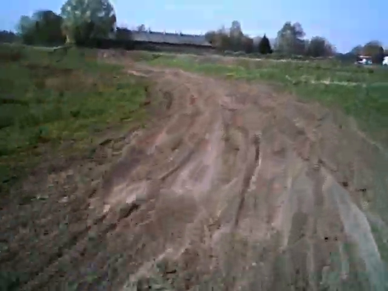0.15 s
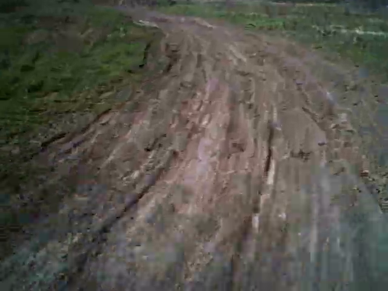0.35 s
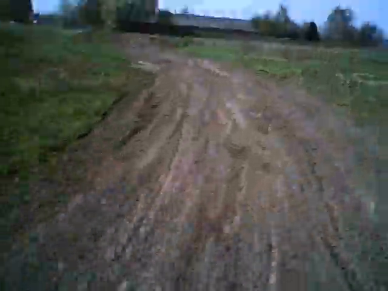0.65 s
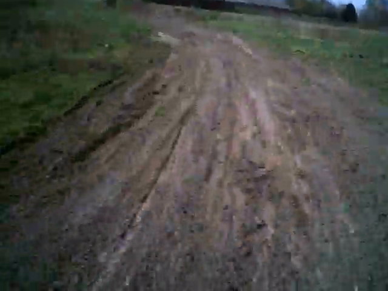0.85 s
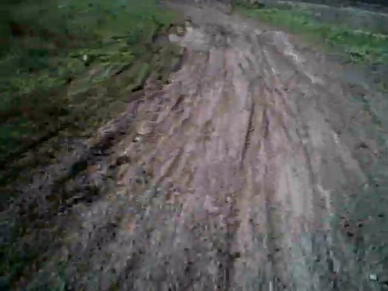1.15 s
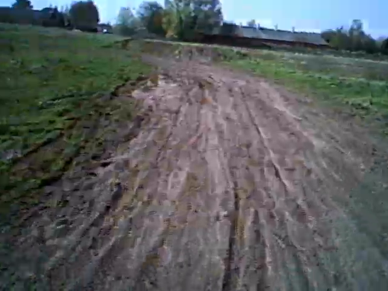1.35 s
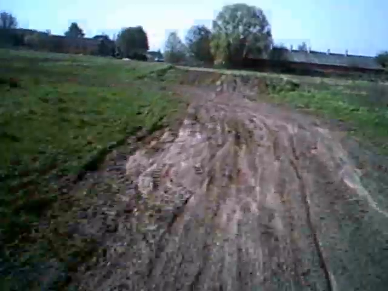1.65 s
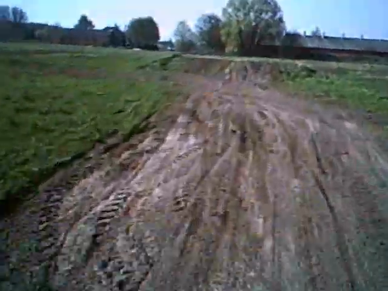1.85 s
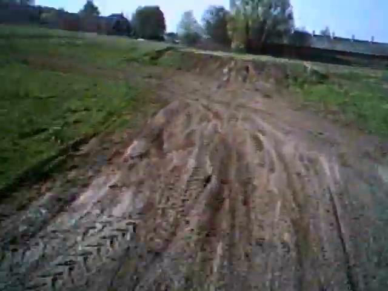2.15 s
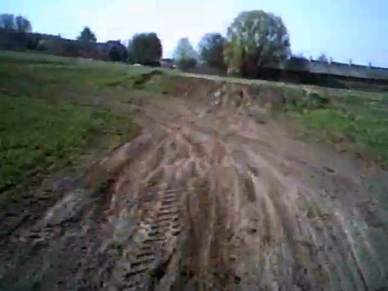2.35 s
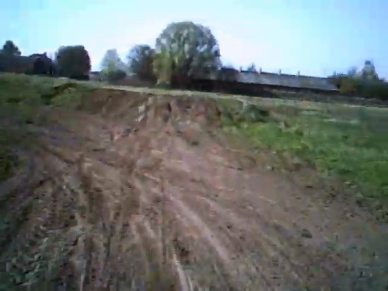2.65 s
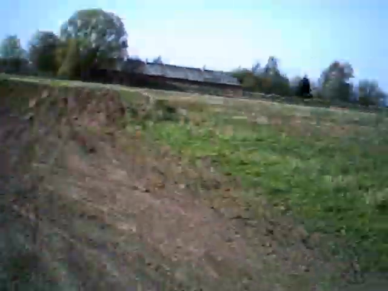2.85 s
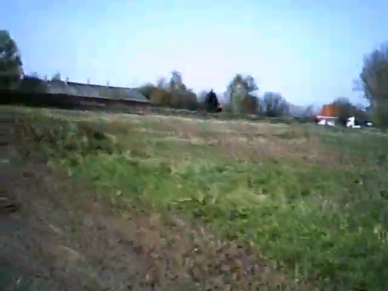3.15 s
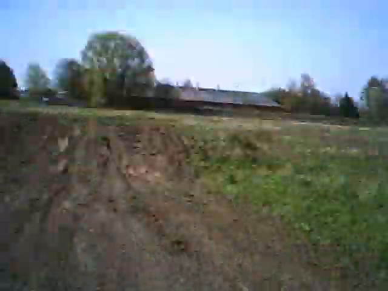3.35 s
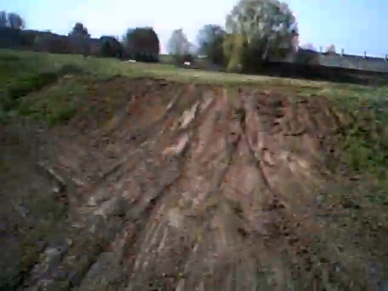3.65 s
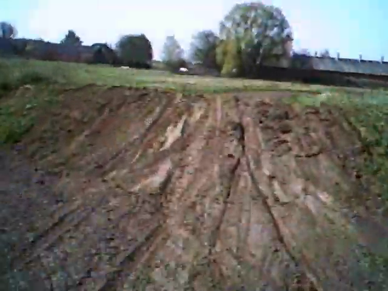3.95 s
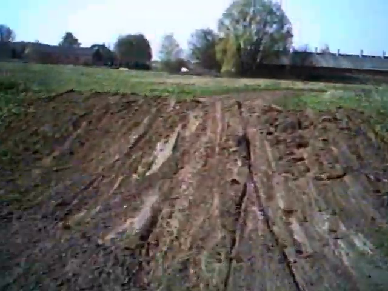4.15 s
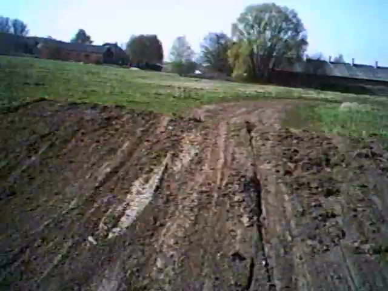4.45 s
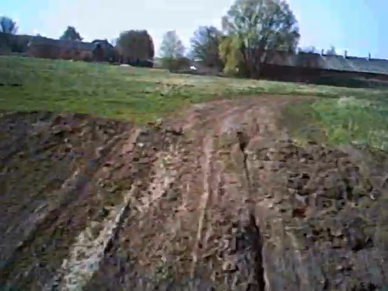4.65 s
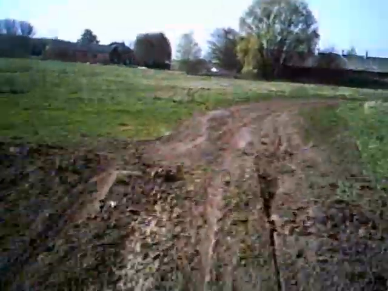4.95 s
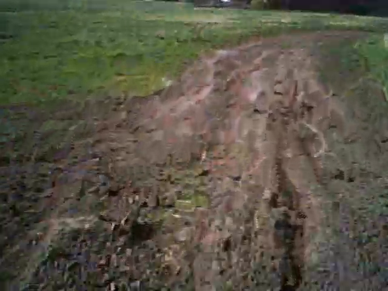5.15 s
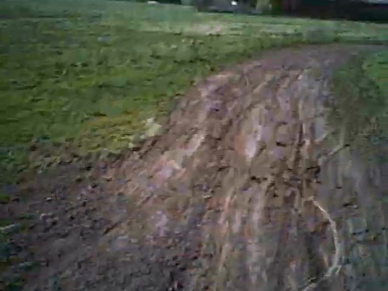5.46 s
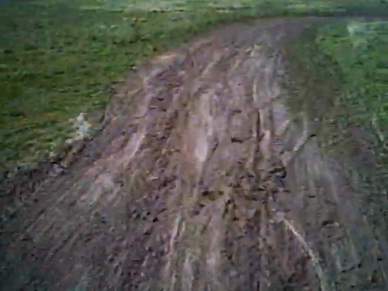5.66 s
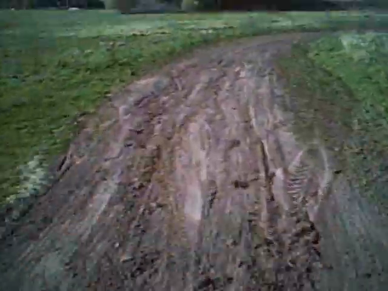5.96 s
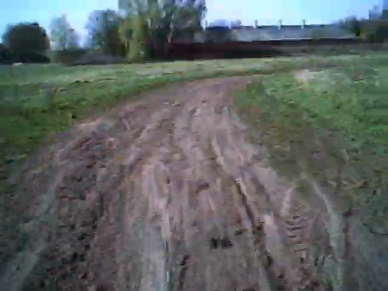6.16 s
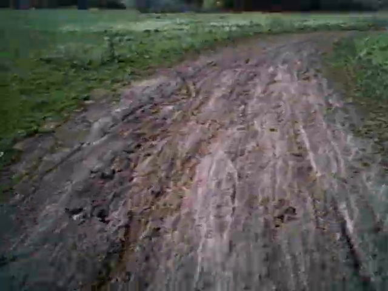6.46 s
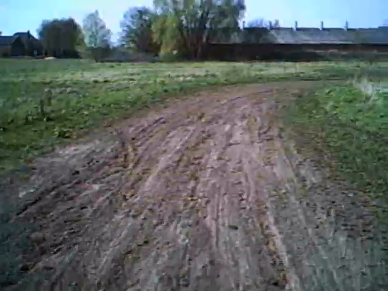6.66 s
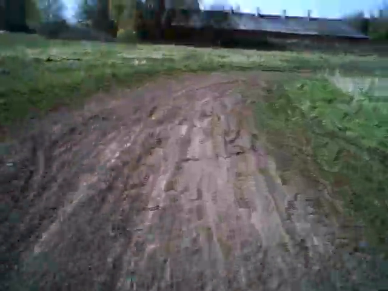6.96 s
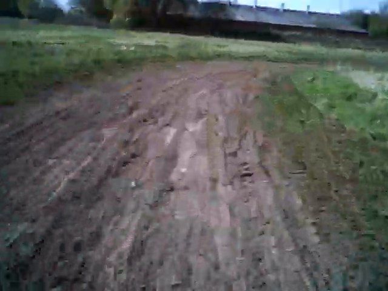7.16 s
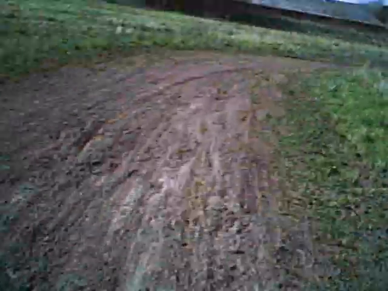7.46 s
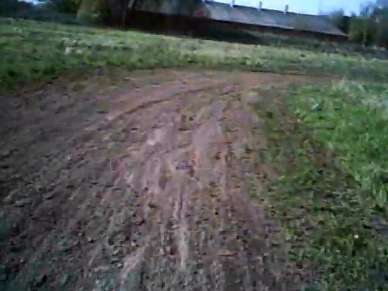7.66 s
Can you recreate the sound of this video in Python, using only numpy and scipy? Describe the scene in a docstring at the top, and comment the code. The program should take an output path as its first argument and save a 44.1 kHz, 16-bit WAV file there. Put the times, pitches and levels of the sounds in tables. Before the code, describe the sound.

A small single-cylinder engine revs and eases over a rough dirt track, rattling and clacking, with wind gusts buffeting an overloaded onboard microphone.

```python
"""A small single-cylinder four-stroke rides a rough dirt track, heard by a microphone on board.
It starts on open throttle and revs up through gusts in the first two seconds, slows by 3 s to a low thump as a hard
gust and sharp ticks break in, takes two brief stabs of throttle before 5 s, then revs and eases to the end.
Exhaust pulses are sums of harmonics weighted by pipe resonances; bark, clatter, ticks, hiss and wind are
filtered impulses and noise. A preamplifier saturates on the loud passages and passes only a narrow band."""
import sys
import numpy as np
from scipy import signal
from scipy.fft import rfft, irfft
from scipy.io import wavfile
from scipy.ndimage import uniform_filter1d

SR = 44100
rng = np.random.default_rng(int(sys.argv[2]) if len(sys.argv) > 2 else 0)


def master(y):
    """Save y as 16-bit WAV."""
    cut = np.clip(np.atleast_2d(y).T, -1, 1)
    pcm = np.round(cut * 32767)  # scale
    wavfile.write(sys.argv[1], SR, pcm.astype(np.int16))


N = 343980  # samples

CRUISE_HZ = 45  # firing rate at cruising speed
RELEASE_S = 0.11  # the throttle closes
RUT_FADE_S = 0.13
BREEZE_DB, GUST_FALL_S = -31.5, 0.32
SMALL_TICKS_PER_S, SMALL_TICK_DB, SMALL_TICK_SPREAD_DB = 2.2, -31.5, -1.5
BAND_HZ, TOP_HZ = 3680, 15800  # band limits after the first and second saturation


def undb(db):
    """Decibels are logarithmic: 20 dB is a tenfold amplitude."""
    return 10 ** (np.asarray(db) / 20)


def steady(x, size=8820):
    """Level normalization: division by a running rms leaves only the fast flutter."""
    power = uniform_filter1d(uniform_filter1d(x ** 2, size), size // 2)
    return x / np.sqrt(np.abs(power) + 1e-18)


def lowpass(x, hz, order=2):
    """Butterworth filtering: a smooth roll-off above hz."""
    return signal.sosfilt(signal.butter(order, hz, fs=SR, output="sos"), x)


def cut(x, hz):
    """Elliptic filtering: a steep band limit."""
    return signal.sosfilt(signal.ellip(8, 0.2, 75, hz, fs=SR, output="sos"), x)


def resonate(x, resonances):
    """Modal superposition: parallel band-pass resonances, neighbours of opposite sign."""
    total = 0
    for k, (hz, width, db) in enumerate(resonances):
        b, a = signal.iirpeak(hz, hz / width, fs=SR)
        total = total + (-1) ** k * undb(db) * signal.lfilter(b, a, x)
    return total


def colour(x, spectrum, size=8192):
    """Minimum-phase filtering: a causal response of given spectrum, so blows ring after they land."""
    hz, db = np.transpose(spectrum)
    bins_hz = np.arange(size // 2 + 1) * SR / size
    gain = undb(np.interp(np.log(bins_hz + 1), np.log(hz), db))
    # folding the cepstrum onto positive time makes the response causal
    cepstrum = irfft(np.log(gain))
    cepstrum[1:size // 2] *= 2
    cepstrum[size // 2 + 1:] = 0
    response = irfft(np.exp(rfft(cepstrum)))
    return signal.fftconvolve(x, response)[:N]


def strokes(cycles, place, jitter, scatter_db):
    """Cyclic excitation: one impulse per engine cycle, each with its own timing and size."""
    count = int(cycles[-1]) + 1
    late, size = rng.standard_normal((1024, 2))[:count].T
    phase = np.arange(count) + place + jitter * late
    at = np.interp(phase, cycles, np.arange(N), left=N, right=N)
    return np.bincount(at.astype(int), undb(scatter_db * size), N + 1)[:N]


def puffs(pulses, decay_s):
    """Noise burst: each impulse opens an exponentially decaying envelope on noise."""
    envelope = signal.lfilter([1], [1, -np.exp(-1 / (decay_s * SR))], pulses)
    return envelope * rng.standard_normal(N)


def harmonics(angle, firing_hz, spectrum, lags):
    """Source-filter principle: harmonics from the fifth up slide through fixed pipe resonances."""
    hz, db = np.transpose(spectrum)
    total = 0
    for k, lag in enumerate(lags, 5):
        gain = np.interp(k * firing_hz, hz, undb(db))
        total = total + gain * np.cos(k * angle - lag)
    return steady(total)


def swell(start, length, rise, fall):
    """Piecewise-linear envelope: rise from 0 towards 1, hold until the length is over, fall back."""
    since = np.arange(N) / SR - start
    return np.clip(np.minimum(since / rise, 1 - (since - length) / fall), 0, 1)


def saturate(x, onset, top):
    """Amplitude compression: linear up to the onset, then bending over to the top."""
    room = max(top - onset, 1e-3)
    inside = np.clip(x, -onset, onset)
    return inside + room * np.tanh((x - inside) / room)


def engine_speed():
    """Kinematics of the engine: the firing rate runs in straight lines between the points."""
    # Each row: time in seconds, firing rate in Hz.
    speed = [(0.0, 45.24), (0.32, 44.6), (0.46, 45.2), (0.82, 66.33), (0.91, 66.5), (1.24, 56.66),
             (1.43, 67.6), (1.61, 57.3), (1.78, 46.67), (2.06, 44.87), (2.35, 37.33), (2.58, 35.74),
             (2.87, 35.65), (3.0, 33.66), (3.37, 36.59), (3.54, 37.47), (3.91, 32), (4.17, 34.1),
             (4.58, 32.95), (4.69, 40.47), (4.93, 39.8), (5.06, 33.3), (5.19, 38.77), (5.3, 37.88),
             (5.8, 56.4), (6.04, 46.94), (6.23, 38.16), (6.5, 48.35), (6.78, 51.86), (6.89, 44.8),
             (7.02, 45.1), (7.25, 54), (7.49, 52.43), (7.65, 44.6), (7.8, 42.95)]
    s, hz = np.transpose(speed)
    return np.interp(np.arange(N) / SR, s, hz)


def throttle():
    """Load control: how far the throttle is open (0-1), and the lift in dB it gives each layer."""
    # Each row: start in seconds, length in seconds, rise in seconds, then the lifts in dB of drone,
    # overtones, bark, clatter and hiss.
    pulls = [(-.1, 0.96, .05, 1.5, 4.5, 4.5, 2.5, 9), (0.445, 0.43, 0.1, 4.5, 14.5, 9.5, 7.5, 16),
             (0.803, 0.76, 0.14, 3.5, 9, 9.5, 5.5, 6), (4.61, 0.076, 0.034, 1, 11.5, 10.5, 4.5, 5),
             (4.785, 0.076, 0.075, -3, 11, 13.5, 4.5, 15), (5.109, 0.39, 0.12, 6, 10.5, 10, 4, 7),
             (5.38, .36, .1, 3.5, 4.5, 2.5, 1.2, 7), (6.192, 0.27, 0.2, 6, 15.5, 11.5, 7, 8),
             (6.393, 0.61, 0.095, -2, 0, 1, -2.5, -2), (7.017, .21, 0.096, 5.5, 7.5, 2, 3, -9),
             (7.196, 0.27, 0.096, 2.5, 0.5, -0.5, 4.5, 2)]
    # Power of the opening for drone, overtones, bark, clatter and hiss; the smaller, the earlier in the rise.
    response = [1.1, 0.91, .85, 1.2, 1]
    opens, lifts = [], []
    for start, length, rise, *lift_db in pulls:
        opening = swell(start, length, rise, RELEASE_S)
        opens.append(opening)
        lifts.append([db * opening ** power for db, power in zip(lift_db, response)])
    # the largest wins; a shut pull counts as a lift of 0 dB
    return np.max(opens, axis=0), np.max(lifts, axis=0)


def drone_levels(octaves, opening, lift_db):
    """Load-dependent spectrum: low harmonics follow speed; the open throttle crossfades their levels."""
    # Rows for the 2nd, 3rd and 4th harmonic of the firing rate. Each row: shut level in dB at cruising
    # speed, its slope in dB per octave of speed, open level in dB at cruising speed, its slope in dB per octave.
    low_harmonics = [(-28.5, 11, -27.5, 9.5), (-25, 12.5, -48, 47.5), (-31, -11.5, -29.5, 34.5)]
    levels = []
    for shut_db, shut_slope, open_db, open_slope in low_harmonics:
        shut = shut_db + shut_slope * octaves
        opened = open_db + open_slope * octaves
        levels.append((1 - opening) * shut + opening * opened + lift_db)
    return levels


def exhaust(cycles, firing_hz, drone_db, overtones_db, bark_db):
    """Fourier synthesis: low harmonics add up to one thump per cycle; throttle brings out higher ones."""
    # Resonances of the pipe for the body of the tone. Each row: frequency in Hz, relative level in dB.
    pipe_body = [(150, -5.5), (215, 13.5), (280, 10), (335, -5), (410, -7), (500, -14.5), (580, -27),
                 (800, -38.5)]
    # The same for its upper edge. Each row: frequency in Hz, relative level in dB.
    pipe_edge = [(280, -28), (400, -5), (500, 3.5), (575, -6.5), (650, -3), (780, -5.5), (1000, -7.5),
                 (1250, -14.5)]
    # no two firings come equally early or equally hard
    wobble = steady(lowpass(rng.standard_normal(N), hz=22.1))
    strength = steady(lowpass(rng.standard_normal(N), hz=22.1))
    angle = 2 * np.pi * (cycles + 0.0035 * wobble - 0.1)
    second_db, third_db, fourth_db = drone_db
    drone = undb(second_db - 9.5) * np.sin(angle)
    drone += undb(second_db) * np.sin(2 * angle)
    drone += undb(third_db) * np.sin(3 * angle)
    drone += undb(fourth_db) * np.sin(4 * angle)
    # reflections in the silencer delay the upper harmonics and scatter their phases, blunting each pulse
    late = angle - 2 * np.pi * 0.1409
    lags = 1.25 * rng.standard_normal(20)  # radians
    body = undb(overtones_db) * harmonics(late, firing_hz, pipe_body, lags)
    edge = undb(bark_db - 4.5) * harmonics(late, firing_hz, pipe_edge, lags)
    return (np.sqrt(2) * drone + body + edge) * undb(1.2 * strength)


def bark(cycles):
    """Flow noise exciting resonators: gas rushes after each firing and rings the upper pipe modes."""
    # Each row: frequency in Hz, bandwidth in Hz, relative level in dB.
    pipe_modes = [(239, 79, -3), (501, 120, 0.5), (676, 170, 1), (810, 310, -4), (1260, 490, -9.5)]
    firings = strokes(cycles, place=0.15, jitter=0.0011, scatter_db=-1.0)
    gas = puffs(firings, decay_s=0.012)
    return steady(lowpass(resonate(gas, pipe_modes), hz=1270, order=4))


def clatter(cycles):
    """Impact excitation: piston and valves knock in step, loose parts rattle at random, the frame rings."""
    # Metal knocks within a cycle. Each row: place in the cycle (0-1), relative level in dB.
    knock_places = [(.03, 5), (0.271, 0.5), (0.518, 2), (0.762, -1.5)]
    # Response of engine and frame. Each row: frequency in Hz, relative level in dB.
    frame_spectrum = [(300, -48), (700, -22), (1000, -13.5), (1200, -7.5), (1310, -4), (1395, 2.5),
                      (1450, -5.5), (1550, -11.5), (1700, -22), (2000, -29.5), (2400, -44), (3700, -44.5)]
    knocks = sum(undb(db) * strokes(cycles, place, jitter=0.025, scatter_db=0.5)
                 for place, db in knock_places)
    chance, size = rng.random(N), rng.standard_normal(N)
    # some hundreds of taps a second
    rattle = size / (1 + np.exp(np.minimum(chance * SR - 260, 30)))
    scrape = puffs(knocks, decay_s=0.0047)
    blows = undb(-4) * steady(knocks) + steady(scrape) + undb(-4.5) * steady(rattle)
    return steady(colour(blows, frame_spectrum))


def ruts_lift():
    """Forced vibration: rutted stretches shake the frame and lift the clatter, in dB."""
    # Each row: start in seconds, length in seconds, lift of clatter in dB.
    stretches = [(1.588, 1.29, 3.5), (2.153, 0.58, 1.5), (3.056, 0.33, 6.5), (3.75, 0.3, 1.5)]
    return sum(db * swell(start, length, RUT_FADE_S, RUT_FADE_S) for start, length, db in stretches)


def ticks():
    """Impulse response: an impulse with a brief noise burst rings broadly for a millisecond or two."""
    # Short bright ticks, the loudest under open throttle. Each row: time in seconds, level in dB before the ring.
    tick_times = [(0.2387, -16.5), (0.3661, -10), (1.835, -9), (1.8689, -14), (2.0734, -15),
                  (2.2404, -10.5), (3.1567, -6.5), (3.197, -11), (3.2724, -13), (3.3183, -10),
                  (3.3465, -11), (3.3827, -6), (3.4584, -19), (3.522, -13), (3.6378, -13), (4.6468, -19),
                  (4.8727, -16), (5.4302, -11), (5.7391, -6), (6.2649, -10.5), (6.4706, -4), (6.6314, -12),
                  (6.833, -11), (7.132, -13), (7.23, -13), (7.3074, -17), (7.3989, -1), (7.4358, -5.5),
                  (7.512, -13)]
    s, db = np.transpose(tick_times)
    chance, size = rng.random(N), rng.standard_normal(N)
    # small ticks fall at random between
    small = (chance < SMALL_TICKS_PER_S / SR) * undb(SMALL_TICK_DB + SMALL_TICK_SPREAD_DB * size)
    impulses = np.bincount((s * SR).astype(int), undb(db), N) + small
    snap = impulses + undb(-16.5) * puffs(impulses, decay_s=0.0015)
    ring = [(2500, 1000, 0)]  # Hz, bandwidth in Hz, dB
    return undb(15) * resonate(resonate(snap, ring), ring)


def hiss(cycles):
    """Amplitude modulation: a thin band of noise flutters with the crank, twice per engine cycle."""
    flutter = 1 + 0.31 * np.sin(2 * np.pi * 2 * cycles)
    noise = rng.standard_normal(N) * flutter
    band = [(3170, 800, 0)]  # Hz, bandwidth in Hz, dB
    return steady(resonate(resonate(noise, band), band))


def gust_level():
    """Wind strength in dB: the strongest gust of the moment rises over a constant breeze."""
    # Each row: start in seconds, length in seconds, rise in seconds, lift of wind strength in dB.
    gusts = [(0.377, 0.24, 0.17, 13), (1.352, 0.99, 0.15, 9), (2.203, 0.77, 0.14, 7),
             (3.016, 0.41, 0.086, 21), (5.1, 0.42, .15, 14), (6.383, 0.22, 0.18, 13)]
    lifts = [db * swell(start, length, rise, GUST_FALL_S) for start, length, rise, db in gusts]
    return BREEZE_DB + np.max(lifts, axis=0)


def wind(gust_db):
    """Turbulent pressure at the microphone: quick low shoves; the stronger the gust, the higher it reaches."""
    # Slow turbulence. Each row: frequency in Hz, relative level in dB.
    rumble_spectrum = [(10, -27), (25, -10), (42, 4.5), (80, -4.5), (160, -9), (300, -16), (1000, -43)]
    # Turbulence of the gusts. Each row: frequency in Hz, relative level in dB.
    buffet_spectrum = [(20, -23.5), (70, -3), (145, 2), (300, -5), (500, -20.5), (1000, -34), (2500, -74)]
    shoves = undb(3.2 * steady(lowpass(rng.standard_normal(N), hz=24)))
    rumble = steady(colour(rng.standard_normal(N), rumble_spectrum) * shoves)
    buffet = steady(colour(rng.standard_normal(N), buffet_spectrum) * shoves)
    return undb(0.49 * gust_db - 15) * rumble + undb(1.294 * gust_db + 3.5) * buffet


def scene():
    """Superposition: speed and throttle drive the engine layers; all is close, with no echo in the open field."""
    # Rows for overtones, bark, clatter and hiss with the throttle shut.
    # Each row: level in dB at cruising speed, slope in dB per octave of speed.
    coasting = [(-27.5, 8), (-27, 13), (-21, 10), (-55.5, 22.5)]
    firing_hz = engine_speed()
    opening, (drone_lift_db, *lifts_db) = throttle()
    cycles = np.cumsum(firing_hz) / SR
    octaves = np.log2(firing_hz / CRUISE_HZ)
    drone_db = drone_levels(octaves, opening, drone_lift_db)
    overtones_db, bark_db, clatter_db, hiss_db = (
        db + slope * octaves + lift for (db, slope), lift in zip(coasting, lifts_db))
    # combustion is ragged at low speed and cleans up as the engine revs
    ragged_db = np.interp(firing_hz, [38, 50, 65], [-3.5, -8, -10])
    engine = exhaust(cycles, firing_hz, drone_db, overtones_db, bark_db)
    engine = engine + undb(bark_db + ragged_db) * bark(cycles)
    machine = undb(clatter_db + ruts_lift()) * clatter(cycles)
    machine = machine + ticks() + undb(hiss_db) * hiss(cycles)
    return (engine + machine + wind(gust_level()))[None]


def record(dry):
    """Nonlinear distortion: the preamplifier clips, the band is narrow, overshooting peaks rasp."""
    narrow = cut(saturate(dry, onset=0.46, top=0.46), BAND_HZ)
    return cut(saturate(narrow, onset=0.43, top=0.52), TOP_HZ)


dry = scene()
out = record(dry)
master(out)
```